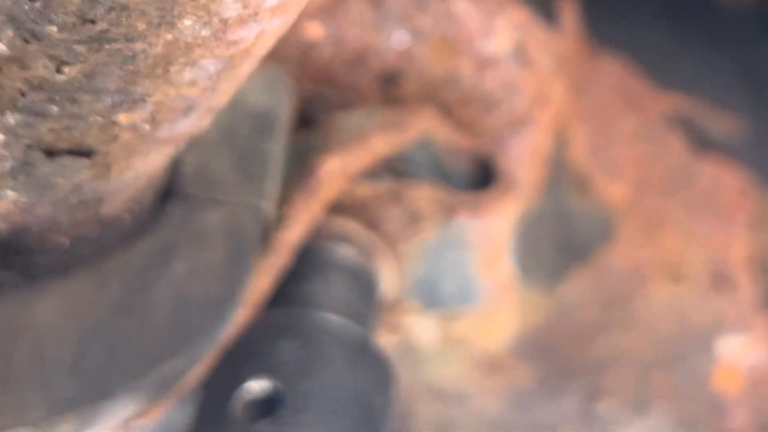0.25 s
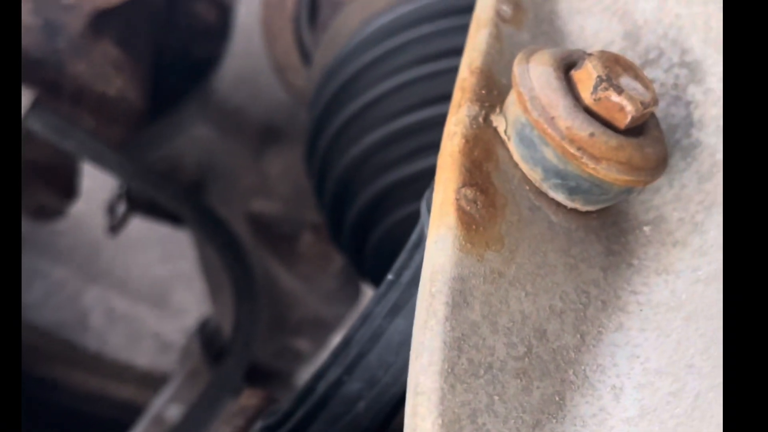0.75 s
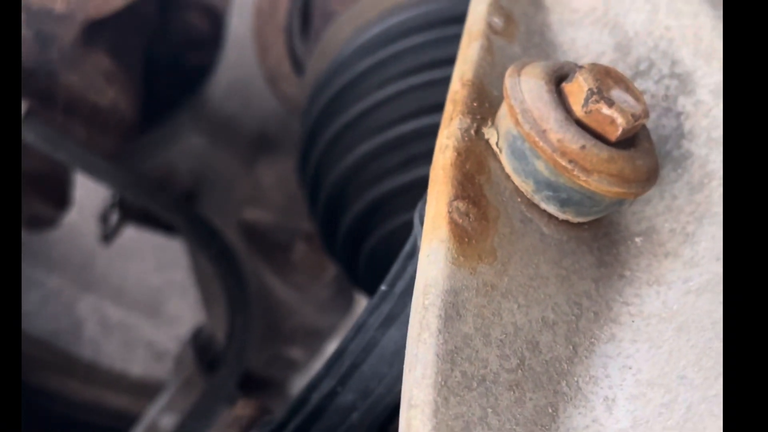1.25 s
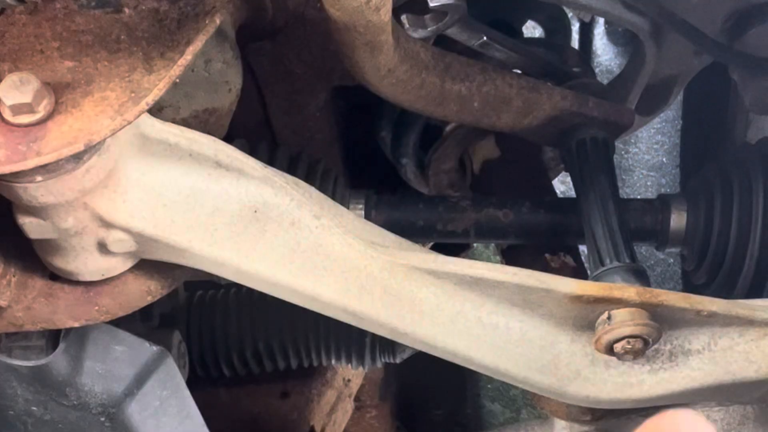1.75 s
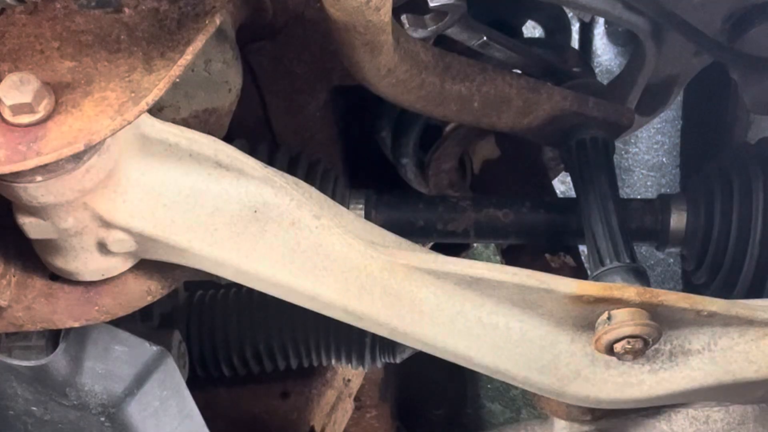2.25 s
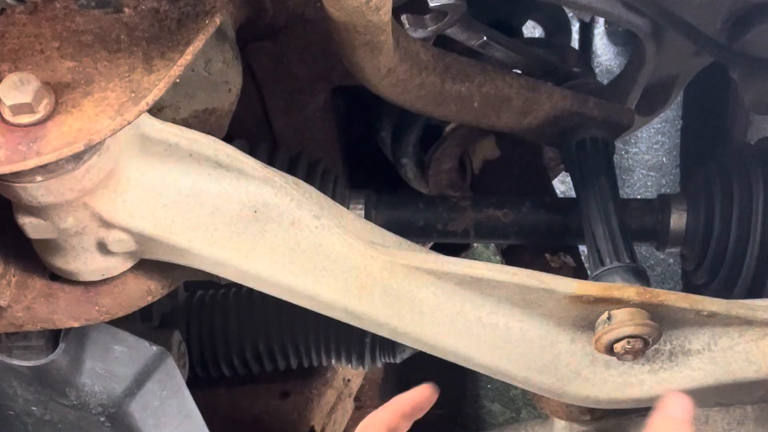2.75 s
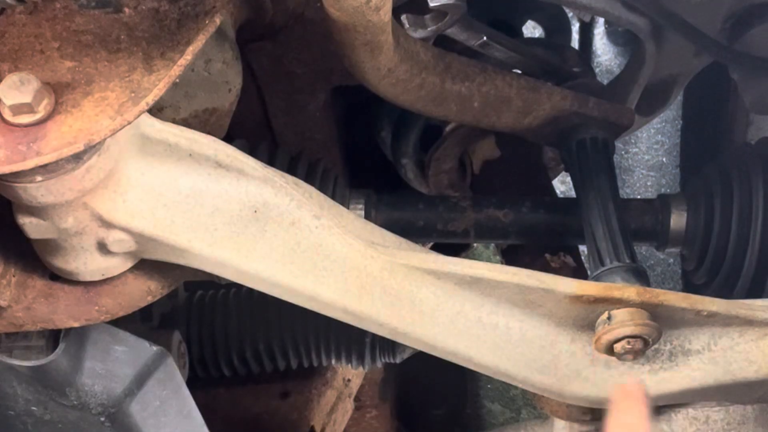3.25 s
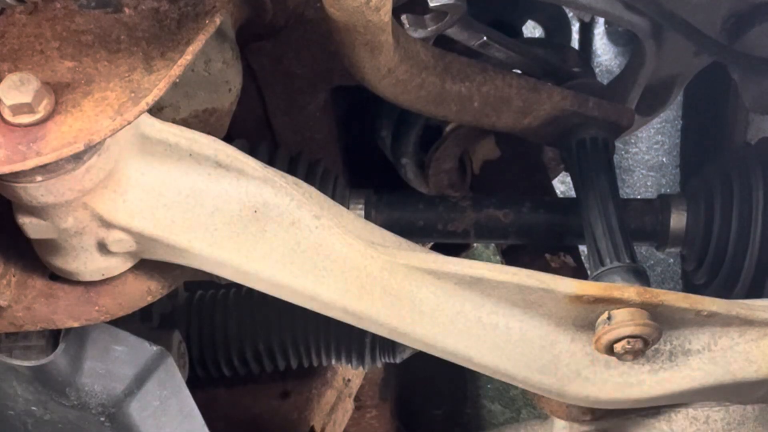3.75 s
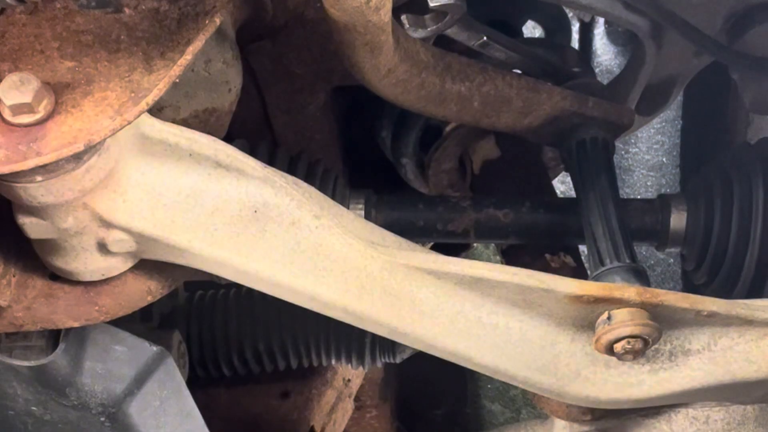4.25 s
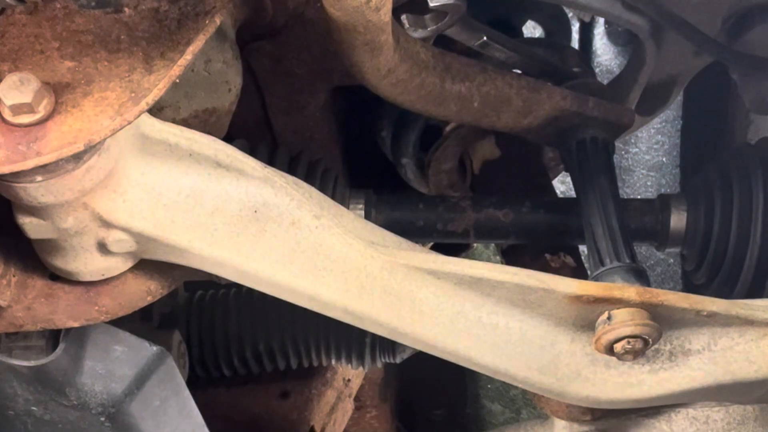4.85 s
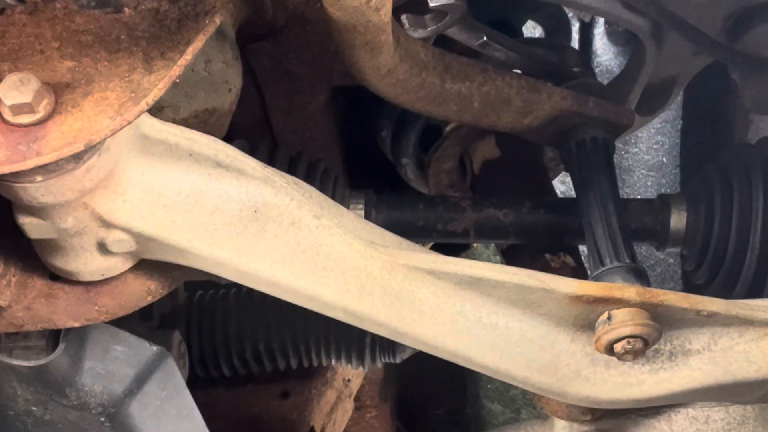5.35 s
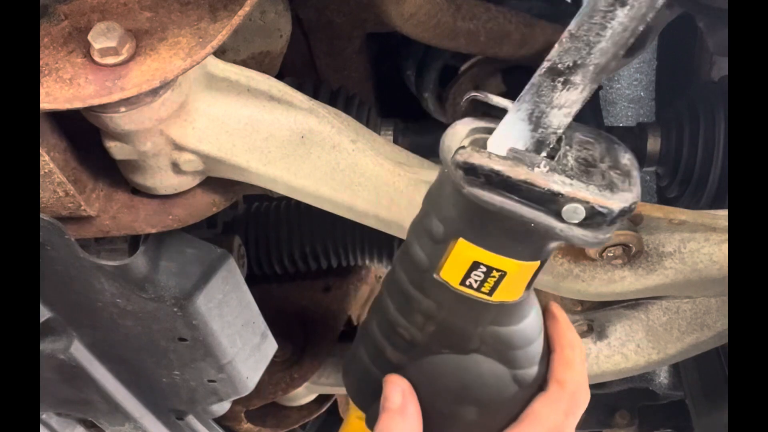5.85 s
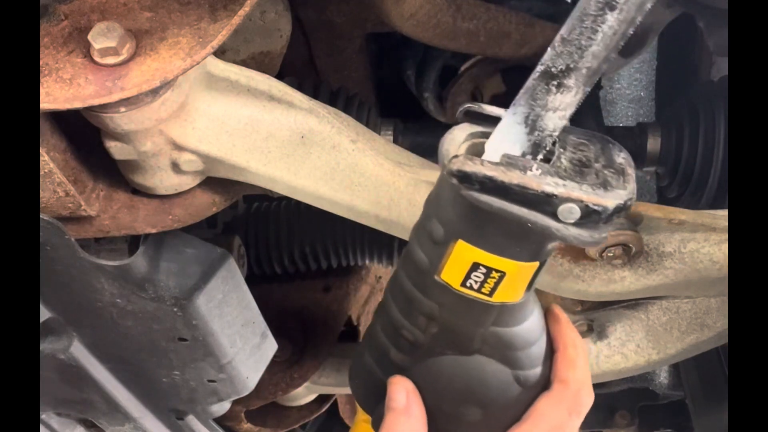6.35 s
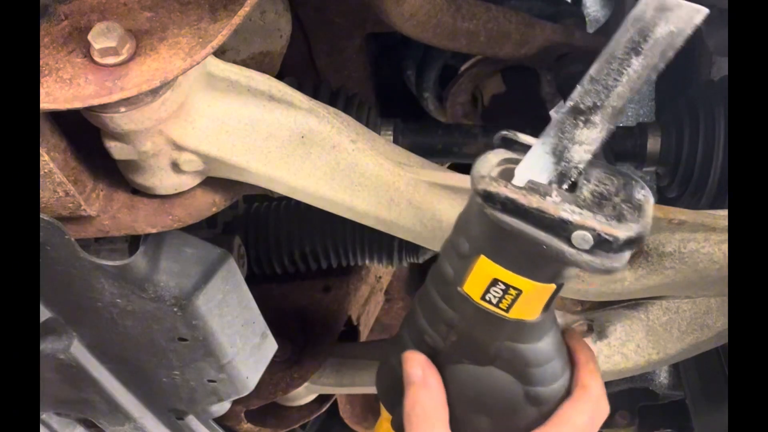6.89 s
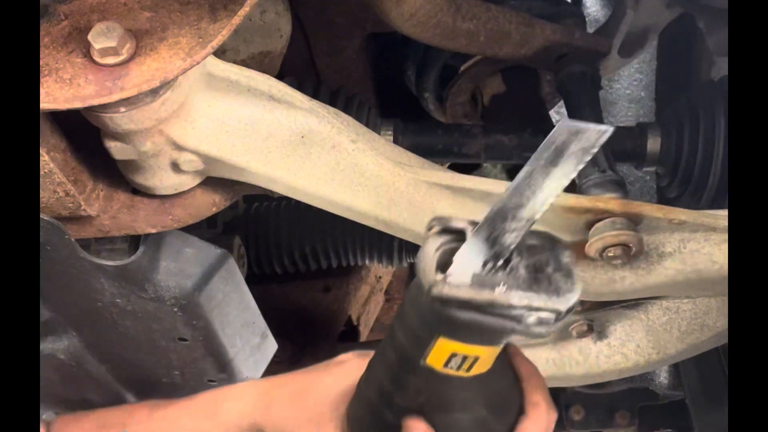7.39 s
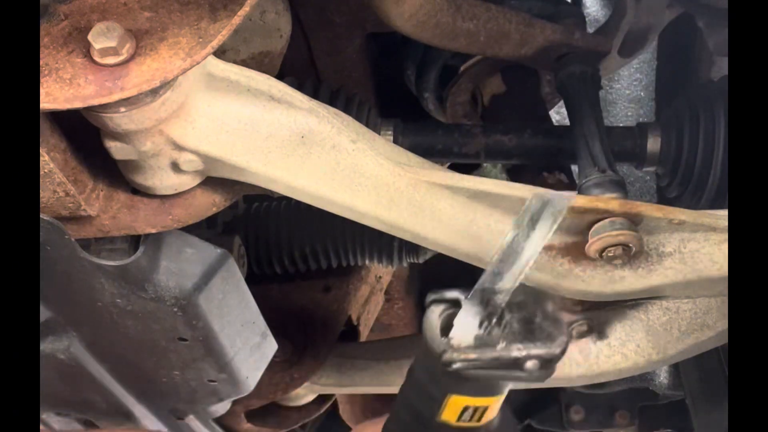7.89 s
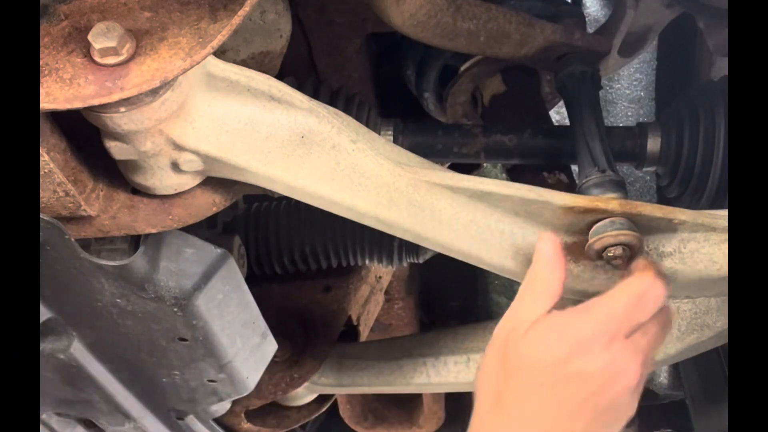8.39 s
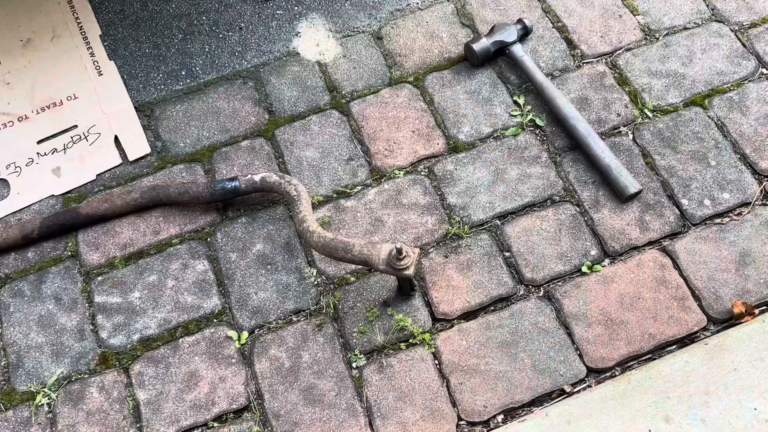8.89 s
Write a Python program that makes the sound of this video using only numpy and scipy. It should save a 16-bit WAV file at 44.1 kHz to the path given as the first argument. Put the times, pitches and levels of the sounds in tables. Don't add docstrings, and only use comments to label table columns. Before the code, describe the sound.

Inside a jolting truck cabin, metal knocks and clatters over deep tyre boom and grit; an abrupt cut leaves faint outdoor hum and light touches.

```python
import sys
import numpy as np
from scipy import signal
from scipy.fft import rfft, irfft, next_fast_len
from scipy.io import wavfile
from scipy.ndimage import map_coordinates

SR = 44100
rng = np.random.default_rng(int(sys.argv[2]) if len(sys.argv) > 2 else 0)


def boost(x):
    u = np.asarray(x, float) / 20
    return 10 ** u


def materialize(psi):
    bounded = np.clip(np.atleast_2d(psi).T, -1, 1)
    quanta = np.round(bounded * 32767).astype(np.int16)
    wavfile.write(sys.argv[1], SR, quanta)


N = 402633


def along(points, hz):
    f, v = np.transpose(points)
    return np.interp(np.log(hz + 1), np.log(f + 1), v)


def curves(rows):
    s, *columns = np.transpose(rows)
    return [np.interp(np.arange(N) / SR, s, column) for column in columns]


def wobble(rate):
    knots = rng.standard_normal(int(N * 400 / SR) + 4)
    return map_coordinates(knots, [np.arange(N) * rate / SR])


def coloured(x, *spectra):
    m = next_fast_len(N + 8192)
    hz = np.fft.rfftfreq(m, 1 / SR)
    gain = boost(sum(along(spectrum, hz) for spectrum in spectra))
    return irfft(rfft(x, m) * gain, m)[..., :N]


def add(track, s, sound):
    start = round(s * SR)
    track[..., start:start + sound.shape[-1]] += sound


def sine(pitch):
    return np.sin(2 * np.pi * np.cumsum(pitch) / SR)


# (frequency [Hz], likeness [-1 to 1])
PORT_LIKENESS = [(30, 0.56), (200, 0.17), (500, -0.15), (1200, -0.32), (2400, -0.06), (4400, 0.53),
                 (8000, 0.39), (15000, 0)]


def rush(mid, side, side_db, lump_db, lump_rate):
    m = next_fast_len(N)
    hz = np.fft.rfftfreq(m, 1 / SR)
    lumps = boost(lump_db * wobble(lump_rate))
    a, b = rfft(lumps * rng.standard_normal((2, N)), m)
    lean = along(PORT_LIKENESS, hz)
    side_gain = boost(side_db + sum(along(spectrum, hz) for spectrum in side))
    difference = (lean * a + np.sqrt(1 - lean ** 2) * b) * side_gain
    pair = irfft([a * boost(along(mid, hz)), difference], m)[:, :N]
    return pair / np.std(pair[0])


def ring(modes, t, spread_db, attack, detune):
    hz, db, t60 = np.transpose(modes)[:, :, None]
    luck = rng.standard_normal((3, len(modes), 1))
    phase = 2 * np.pi * hz * (1 + detune * luck[1]) * t + 2 * luck[2]
    tones = boost(db + spread_db * luck[0] - 60 * t / t60) * np.sin(phase)
    return tones.sum(0) * (1 - np.exp(-t / attack))


def chatter(sound, length, rebound, count):
    luck = rng.random((2, count))
    when = length * -np.log(1 - .9 * luck[0])
    size = rebound * (2 * luck[1] - 1)
    when[0], size[0] = 0, 1
    train = np.bincount((when * SR).astype(int), size)
    return signal.fftconvolve(sound, train / np.linalg.norm(train))[:len(sound)]


def surge(events, top_s):
    kicks = np.zeros(N + SR)
    u = np.arange(SR // 2) / SR / max(top_s, .002)
    for s, db, *_ in events:
        add(kicks, s, boost(db) * np.e * u * np.exp(-u))
    return kicks[:N]


# (time [s], strength [dB])
ROAD_ROUGHNESS = [(3.6, -31.5), (3.75, -24), (3.87, -28.5), (4.25, -25), (4.44, -24), (4.8, -26),
                  (5.1, -23), (5.38, -19.5), (5.45, -19.5), (5.6, -20), (5.9, -23), (6.06, -24.5),
                  (6.35, -23), (6.6, -26.5), (6.93, -30.5), (7.35, -29.5), (7.72, -28.5), (8.15, -30.5)]


def road_gain(law, jolts):
    over_db, share, surge_db, top_s = law
    strength_db, = curves(ROAD_ROUGHNESS)
    mean_db = np.mean(ROAD_ROUGHNESS, axis=0)[1]
    steady = boost(mean_db + over_db + share * (strength_db - mean_db))
    return steady + boost(surge_db) * surge(jolts, top_s)


def thuds(events, cycles, gain_db, side):
    out, t = np.zeros((2, N + SR)), np.arange(SR // 5) / SR
    for s, db, hz in events:
        u = t * hz / cycles
        blow = boost(db + gain_db) * np.e * u * np.exp(-u) * np.sin(2 * np.pi * hz * t)
        add(out, s, np.outer([1, side * rng.standard_normal()], blow))
    return out[:, :N]


# (frequency [Hz], level [dB])
ENGINE_LINES = [(61, -60.5), (103, -54.5), (219, -75)]


def drone():
    out = np.zeros(N)
    for hz, db in ENGINE_LINES:
        level = boost(db + 2.0 * wobble(9))
        out += level * sine(hz * (1 + .04 * wobble(8.9)))
    return out


# (frequency [Hz], level [dB])
HUM = [(13, -44.5), (22, -22), (59, 2), (102, 2.5), (128, -4), (221, -15), (300, -13), (390, -53),
       (660, -120)]
# (time [s], peak level [dB])
GUSTS = [
    (8.225, -55),
    (8.725, -51),
    (9.05, -54),
]
# (frequency [Hz], level [dB])
AIR = [(25, -40), (120, -3), (200, -4.5), (268, -15), (346, -6.5), (1230, -20), (1800, -26), (3050, -34),
       (8370, -43), (9600, -57), (12000, -62), (15600, -92), (22000, -120)]


def yard_air():
    opened = np.clip((np.arange(N) / SR - 8.232) / .004, .6, 1)
    engine = np.outer([1, .05], drone())
    traffic = rush(HUM, [HUM], side_db=-18.0, lump_db=1.5, lump_rate=26)
    air = rush(AIR, [AIR], side_db=1.0, lump_db=1.5, lump_rate=8)
    return engine + (boost(-56.5) + surge(GUSTS, top_s=0.012)) * traffic + boost(-63.5) * opened * air


# (time [s], peak level [dB], pitch [Hz], 60 dB decay [s], brightness [dB])
TAPS = [(8.215, -49, 495, 0.26, 5), (8.33, -56, 500, 0.13, -20), (8.357, -54.5, 6350, 0.18, 6),
        (8.395, -62, 5000, 1, 5), (8.445, -56, 3000, 0.24, -2), (8.482, -45.5, 1595, 0.13, 2.5),
        (8.546, -62, 1200, 0.11, -5), (8.6, -68, 905, 0.38, 6), (8.735, -52, 523, 0.087, -6),
        (8.749, -60, 700, 0.17, 0), (8.91, -66, 900, .2, 4), (9.01, -69, 800, 0.086, -8)]
# (frequency [Hz], level [dB])
SCUFF = [(40, -50), (150, -11), (500, 5), (1800, -4), (3000, -17), (5000, -46)]
# (frequency [Hz], level [dB])
RUSTLE = [(1000, -36), (2500, -15), (5000, -16), (8500, -23.5), (12000, -50)]


def taps():
    low, high, t = np.zeros((2, N + SR)), np.zeros((2, N + SR)), np.arange(SR // 4) / SR
    for s, db, hz, t60, bright_db in TAPS:
        shape = boost(db - 60 * t / t60) * (1 - np.exp(-t / 0.0013))
        a, b = 2.45 * rng.standard_normal((2, len(t)))
        tone = 1.3 * np.exp(-t / 0.011) * np.sin(2 * np.pi * hz * t)
        tap = shape * np.array([a + tone, np.tanh(2.5 / 17) * a + 0.93 * b])
        add(low, s, tap)
        add(high, s, boost(bright_db) * tap)
    return coloured(low[:, :N], SCUFF) + coloured(high[:, :N], RUSTLE)


# (time [s], pitch [Hz], level [dB])
BIRD = [
    (8.52, 4600, -104),
    (8.58, 4560, -92),
    (8.64, 4700, -102),
    (8.83, 4650, -100),
    (8.87, 4600, -93),
    (8.92, 4700, -86),
    (8.96, 4500, -100),
]


def bird():
    pitch, level_db = curves(BIRD)
    smear = 1 + .025 * wobble(200)
    whistle = boost(level_db - 4 + 5 * wobble(90)) * sine(pitch * smear)
    return np.outer([1, .3], whistle)


# (frequency [Hz], level [dB])
CABIN_WIDTH = [(30, -12), (125, -6.5), (500, -4), (900, -0.5), (1500, -5.5), (3500, 2.5)]
# (frequency [Hz], level [dB])
BOOM = [(13, -43), (22, -29.5), (40, -4), (59, 0), (108, -5.5), (141, -10.5), (200, -16.5), (260, -29),
        (440, -120)]
# (frequency [Hz], level [dB])
CRUNCH = [(90, -36.5), (160, 1.5), (300, 1.5), (500, 0.5), (750, -4), (1300, -59.5)]
# (frequency [Hz], level [dB])
PATTER = [(450, -35.5), (750, 2), (1000, 2.5), (1500, -4.5), (1900, -12.5), (2400, -20), (3500, -56)]
# (frequency [Hz], level [dB])
HISS_MID = [(880, -20.5), (1500, -4), (1780, -6.5), (2450, -5.5), (3950, -14.5), (4980, -14.5),
            (8120, -17.5), (9150, -22), (9910, -77), (10600, -72), (11150, -26.5), (11800, -28),
            (13800, -26.5), (15400, -23), (16300, -82.5)]
# (frequency [Hz], level [dB])
HISS_SIDE = [(880, -31.5), (1500, -7.5), (2110, -9), (2990, -8.5), (4160, -14), (6080, -11), (7200, -18.5),
             (9820, -11), (11500, -18), (12600, -37.5), (13000, -75), (13900, -58), (14300, -28.5),
             (14800, -18.5), (15600, -17.5), (16300, -30)]
# (level over the roughness [dB], share of its swing [0-1], surge after a jolt [dB], time to the surge's top
# [s], at least 0.002)
BOOM_LAW = (-1.5, .5, -12, -0.0245)
CRUNCH_LAW = (-2.5, 0.91, -29, -0.33)
PATTER_LAW = (-7.5, 0.63, -25.5, -0.2)
HISS_LAW = (-16, 0.19, -38, -3)


def road():
    boom = rush(BOOM, [BOOM, CABIN_WIDTH], side_db=2.5, lump_db=2.23, lump_rate=10)
    crunch = rush(CRUNCH, [CRUNCH, CABIN_WIDTH], side_db=1.5, lump_db=3, lump_rate=55)
    patter = rush(PATTER, [PATTER, CABIN_WIDTH], side_db=-2.5, lump_db=2.0, lump_rate=180)
    hiss = rush(HISS_MID, [HISS_SIDE], side_db=-5.0, lump_db=1.0, lump_rate=160)
    clumps = boost(2.07 * wobble(25))
    gravel = road_gain(CRUNCH_LAW, STONES + LINK) * crunch + road_gain(PATTER_LAW, LINK) * patter
    return road_gain(BOOM_LAW, BUMPS) * boom + clumps * gravel + road_gain(HISS_LAW, LINK) * hiss


# (frequency [Hz], level [dB])
GRAVEL = [(150, -30.5), (350, 0), (800, -1.5), (1600, -15), (3000, -19.5), (6000, -35.5)]


def pops(rate, spread_db, gain_db):
    luck = rng.random((3, N))
    cracking = luck[0] < rate / SR
    size = cracking * np.sign(luck[1] - .5) * boost(-spread_db * np.log(1 - .98 * luck[2]))
    place = np.cos(40 * luck[2])
    both = coloured(size * np.array([np.ones(N), .6 * place]), GRAVEL)
    return boost(gain_db) * road_gain(PATTER_LAW, LINK) * both / np.std(both[0])


# (time [s], peak level [dB], pitch [Hz])
BUMPS = [(3.71, -10.5, 61.7), (3.794, -10.5, 76.4), (4.023, -10, 57), (4.217, -11, 63), (4.256, -11, 72),
         (4.495, -23, 68.7), (4.53, -14, 55), (4.849, -11, 98.7), (5.008, -18.5, 56.4), (5.16, -12, 61.8),
         (5.2, -10, 59.7), (5.35, -12, 91.4), (5.615, -12, 71.4), (5.957, -9, 61.7), (6.137, -12, 66.6),
         (6.259, -3, 73), (6.327, -8, 76), (6.698, -32, 57), (7.012, -12.5, 88), (7.087, -12.5, 65.6),
         (7.223, -13.5, 69.5), (7.423, -22, 66.6), (7.602, -31, 66), (7.68, -24, 49), (7.827, -17, 76),
         (8.048, -12, 61.5), (8.141, -18, 61)]


def bumps():
    return thuds(BUMPS, cycles=1.14, gain_db=-9.0, side=.4)


# (time [s], peak level [dB], pitch [Hz])
STONES = [(3.588, -17, 740), (4.055, -15, 686), (4.6103, -10.5, 1120), (4.235, -14, 410),
          (4.494, -9.5, 600), (4.839, -15, 428), (4.927, -13, 485), (5.072, -9.5, 408), (5.133, -6.5, 388),
          (5.188, -10, 375), (5.214, -8.5, 381), (5.29, -20, 317), (5.386, -18.5, 539), (5.539, -13.5, 448),
          (5.584, -11.5, 312), (5.746, -11.5, 602), (5.775, -12, 292), (4.911, -21, 1100),
          (6.219, -14, 312), (6.266, -9.5, 484), (6.351, -13.5, 285), (5.332, -6, 439.5),
          (6.5925, -4.5, 900), (6.823, -13.5, 620), (6.975, -13.5, 520), (7.047, -12.5, 650),
          (7.975, -13.5, 920), (7.68, -12.5, 414), (7.707, -13, 297), (8.157, -15.5, 740)]


def stones():
    return thuds(STONES, cycles=1.67, gain_db=-7.5, side=0.55)


# (time [s], peak level [dB], pitch [Hz])
THUMPS = [(3.946, -21, 320), (4.405, -19, 303), (4.491, -16, 176), (4.682, -24, 310), (5.459, -18.5, 132),
          (5.624, -12.5, 365), (5.794, -10.5, 263), (5.836, -14.5, 304), (5.891, -12, 190),
          (5.98, -15, 142), (6.21, -14, 224), (6.453, -16.5, 144), (6.726, -23, 395), (6.925, -18.5, 212),
          (7.026, -31, 134), (7.256, -18, 476), (7.368, -20, 480), (7.631, -28.5, 164), (7.805, -19, 258),
          (7.928, -14, 536), (7.999, -21, 457), (8.057, -16, 147)]


def thumps():
    return thuds(THUMPS, cycles=1.3, gain_db=-5, side=0.43)


# (time [s], peak level [dB], centre frequency [Hz])
CLICKS = [(3.6656, -35, 2210), (4.2765, -20.5, 1800), (4.372, -26, 2120), (4.672, -29, 2370),
          (4.855, -12, 2770), (5.435, -29.5, 3250), (6.537, -31, 3400), (6.6384, -25, 2030),
          (6.7634, -25, 2210), (6.8197, -16.5, 3440), (6.985, -29, 2330), (7.245, -27, 2220),
          (7.444, -28, 2270), (7.929, -26.5, 4500), (7.9304, -32, 2130), (7.995, -42, 2100),
          (8.115, -26.5, 2600),
          (3.5936, -26, 1700), (3.75, -38, 1900), (3.8394, -35, 2000), (4.0794, -34, 2000),
         (4.4467, -27, 1700), (5.7314, -33, 2200), (5.87, -25, 1700), (6.0107, -31, 2300),
         (6.296, -32, 1900), (6.419, -36, 1800), (6.659, -32, 1800), (6.739, -31, 2400), (7.152, -30, 2300),
         (7.316, -34, 1700), (7.513, -31, 3000), (7.5971, -29, 2500), (7.6394, -33, 2500),
         (7.6839, -33, 1800), (7.7894, -30, 2400), (7.818, -29, 2400), (7.859, -26, 1900),
         (7.9464, -33, 2600), (8.0344, -31, 2200)]


def clicks():
    t60, width = 0.009, 0.69
    out, t = np.zeros((2, N + SR)), np.arange(1024) / SR
    hz = np.fft.rfftfreq(len(t), 1 / SR) + 1
    for s, db, centre_hz in CLICKS:
        band = np.exp(-.5 * (np.log2(hz / centre_hz) / width) ** 2)
        noise = irfft(rfft(rng.standard_normal(len(t))) * band, len(t))
        click = boost(db - 3.5 - 60 * t / t60) * noise / np.std(noise)
        add(out, s, np.outer([1, .4], click))
    return out[:, :N]


# (time [s], dull part level [dB], bright part level [dB])
TICKS = [(4.162, -30, -54), (4.392, -32, -29), (4.6106, -27, -55), (4.8554, -13, -32), (4.874, -32, -53),
         (4.914, -22.5, -39), (5.5811, -14, -31), (5.6535, -27.5, -38.5), (5.6934, -33.5, -52),
         (5.9143, -27.5, -40), (6.052, -21, -44), (6.189, -20, -37), (6.223, -25.5, -50), (6.561, -35, -35),
         (6.584, -22, -48), (6.588, -19, -42), (6.8198, -17, -37.5), (6.919, -25, -34), (7.0484, -18, -60),
         (7.105, -23.5, -39), (7.1518, -22.5, -46), (7.599, -29, -52), (7.6385, -48, -57),
         (7.762, -20, -44), (7.922, -28, -34), (7.995, -48, -40), (7.975, -38, -42), (8.1126, -21.5, -40),
         (8.16, -21.5, -31.5), (8.1854, -46, -39)]
# (frequency [Hz], level [dB])
DULL = [(500, -40.5), (1000, 3), (2000, 1.5), (3500, -7.5), (6000, -36)]
# (frequency [Hz], level [dB])
BRIGHT_MID = [(2500, -42), (4000, -1.5), (8500, -1), (9900, -16.5), (12500, -9.5), (16000, -14.5)]
# (frequency [Hz], level [dB])
BRIGHT_SIDE = [(2500, -43), (4000, -3), (7300, -5.5), (10000, -4), (13000, -25), (16000, -20.5)]


def ticks():
    parts, t = np.zeros((2, N + SR)), np.arange(SR // 20) / SR
    for s, dull_db, bright_db in TICKS:
        shape = boost(-60 * t / 0.023) * (1 - np.exp(-t / 0.00025))
        snap = shape * rng.standard_normal((2, len(t)))
        snap = np.array([chatter(part, .005, rebound=0.72, count=5) for part in snap])
        add(parts, s, boost([[dull_db + 4.0], [bright_db + 5.5]]) * snap)
    dull, bright = coloured(parts[0, :N], DULL), parts[1, :N]
    return np.array([dull + coloured(bright, BRIGHT_MID), -.3 * dull + coloured(bright, BRIGHT_SIDE)])


# (time [s], pitch [Hz], level [dB])
SQUEAK = [
    (6.046, 4150, -60),
    (6.051, 4170, -46),
    (6.057, 4180, -41),
    (6.063, 4170, -52),
    (6.071, 4100, -50),
    (6.076, 4050, -60),
]


def squeak():
    pitch, level_db = curves(SQUEAK)
    sounding = level_db > -59
    loudness = sounding * boost(level_db + 2.9 * wobble(153.5))
    return np.outer([1, .5], loudness * sine(pitch * (1 + 0.0052 * wobble(300))))


# (frequency [Hz], level [dB])
SHUDDER = [(150, -33), (280, -1.5), (450, 0.5), (620, -1.5), (800, -15.5), (1500, -28.5), (3500, -63)]


def shudder():
    panels = rush(SHUDDER, [SHUDDER, CABIN_WIDTH], side_db=-3.0, lump_db=5.5, lump_rate=45)
    return boost(-11.0) * surge(LINK, top_s=0.022) * panels


# (time [s], peak level [dB], bar ring level [dB], chassis knock level [dB])
LINK = [(3.92, -30, -2, 16.5), (3.9865, -36.5, -5, -1), (4.2106, -21, -8, 5), (4.5229, -14, -6.5, 1.5),
        (4.5945, -33, 2, -6), (4.72, -15, -2, -6.5), (4.812, -25, -1, -9), (4.958, -10, -4.5, -7.5),
        (5.0361, -14, -4, -15.5), (5.1332, -11.5, -0.5, -4.5), (5.21, -7.5, -7.5, -9.5),
        (5.2878, -12.5, -3, -16), (5.3694, -7.5, -7.5, -10), (5.129, -31.5, -10, -9),
        (5.453, -20, -4.5, 0.5), (5.5351, -10.5, -2.5, 1.5), (5.6216, -9, -1, -8),
        (5.7729, -13.5, -5.5, -1), (6.1327, -25, -4, -1), (6.5602, -20, -1.5, 4), (6.7115, -18, 0, -6.5),
        (6.786, -31, 3, 1), (6.8594, -25.5, -3, 12), (7.747, -28, -13, -4)]
# (frequency [Hz], level [dB], 60 dB decay [s])
BAR = [(1000, -10, 0.059), (1309, -2, 0.13), (1410, -12, 0.12), (1497, -8.5, 0.048), (1529, 3.5, 0.096),
       (1608, -5, 0.083), (1630, -10.5, 0.05), (1130, -7.5, 0.14), (2300, -18.5, .03), (1888, -1.5, 0.04)]
# (frequency [Hz], level [dB], 60 dB decay [s])
PIN = [(2726, -3.5, 0.046), (3050, -6, 0.036), (3157, -0.5, 0.057), (3395, 10, 0.021), (3722, -1.5, 0.037),
       (4020, -14, 0.026), (4530, -14.5, 0.019), (5230, -15, 0.031), (5014, -11.5, 0.067),
       (5630, -2.5, 0.042), (5950, -15, 0.027), (7550, -8, 0.018), (7900, -15, 0.016)]
# (frequency [Hz], level [dB], 60 dB decay [s])
CHASSIS = [(247, -9.5, 0.25), (325, 6.5, 0.16), (383, -3, 0.16), (493, 2, 0.22), (628, -1, 0.098),
           (840, 2, 0.085)]
# (frequency [Hz], level [dB])
CRACK_MID = [(590, -33.5), (1000, -10), (1520, -1.5), (2140, -20.5), (3110, -10.5), (4460, -16),
             (5450, -15), (6190, -26.5), (8390, -29.5), (9880, -54), (13200, -31.5), (14900, -41),
             (16300, -66.5)]
# (frequency [Hz], level [dB])
CRACK_SIDE = [(120, -34), (200, 2.5), (700, -2), (1330, -8.5), (1660, -2), (2500, -32.5), (3230, -13),
              (4420, -8), (5720, -9.5), (6390, -30.5), (11100, -20), (12400, -41), (16300, -50)]
# (frequency [Hz], level [dB])
AFTER = [(1000, -6.5), (1500, 2.5), (3300, -5), (5500, -1.5), (7000, -9), (11000, -24.5)]


def link():
    snap, after, steel, crack = np.zeros((4, N + SR))
    t = np.arange(SR // 5) / SR
    length = .004
    for s, db, bar_db, knock_db in LINK:
        pin = boost(db - 11.5) * ring(PIN, t, spread_db=4.0, attack=0.00071, detune=0.004)
        bar = boost(db + bar_db - 1.5) * ring(BAR, t, spread_db=2.0, attack=0.0037, detune=0.0074)
        stutter = np.interp(t, t[::130], rng.standard_normal(len(t[::130])))
        bar = bar * boost(2.5 * stutter)
        pin = pin * boost(2.5 * np.roll(stutter[::2].repeat(2, axis=0), 900))
        knock = boost(db + knock_db - 14.5) * ring(CHASSIS, t, spread_db=7, attack=0.0069, detune=0.067)
        add(steel, s, chatter(pin, length, rebound=0.6, count=8))
        add(steel, s, chatter(bar + knock, length, rebound=0.12, count=8))
        add(snap, s, boost(db - 11.0 - 60 * t / 0.017) * rng.standard_normal(len(t)))
        grit = boost(db + 16 - 60 * t / 0.025) * rng.standard_normal(len(t))
        add(crack, s, chatter(grit, length, rebound=0.76, count=8))
        grains_db = 3.9 * np.repeat(rng.standard_normal(len(t) // 90), 90)
        rattle = boost(db + 5.5 + grains_db - 60 * t / 0.15) * (1 - np.exp(-t / 0.0027))
        add(after, s, rattle * rng.standard_normal(len(t)))
    steel, snap = steel[:N], snap[:N]
    crack = crack[:N] + coloured(after[:N], AFTER)
    # (frequency [Hz], level [dB])
    side_of_steel = [(200, -11.5), (1500, -18.5), (3300, -8), (5500, 2.0), (7300, -11.0), (9000, -6)]
    echo = np.roll(crack, 9) - 0.39 * crack
    mid = steel + coloured(crack, CRACK_MID) + coloured(snap, BRIGHT_MID)
    side = coloured(steel, side_of_steel) + boost(-9.5) * coloured(echo, CRACK_SIDE)
    return np.array([mid, side + coloured(snap, BRIGHT_SIDE)])


def scene():
    start_s, end_s = 3.578, 8.2003
    loop = 204550
    t = np.arange(N) / SR
    drive = road() + link() + ticks() + squeak() + pops(rate=70, spread_db=2, gain_db=-9)
    drive = drive + bumps() + stones() + thumps() + clicks() + shudder()
    fade_in = np.clip((t - start_s) / 0.016, 0, 1)
    cut = np.clip((end_s - t) / .002, 0, 1)
    drive = drive * fade_in * cut
    earlier = np.pad(drive[:, loop:], ((0, 0), (0, loop)))
    outside = yard_air() + taps() + bird()
    gap = (t > end_s - loop / SR) & (t < start_s + .01)
    glimpse = boost(-26) * gap * np.roll(outside, -loop, axis=1)
    mid, side = drive + earlier + outside * (1 - cut) + glimpse
    return np.array([mid + side, mid - side])


def roll_off(x):
    return signal.sosfilt(signal.butter(12, 16400, fs=SR, output="sos"), x)


# (frequency [Hz], level [dB])
TOP = [(15000, 0), (15700, -8), (16000, -30), (16400, -90)]


def record(dry):
    held = dry / (1 + np.abs(dry / .87) ** 6) ** (1 / 6)
    return roll_off(coloured(held, TOP))


dry = scene()
out = record(dry)
materialize(out)
```